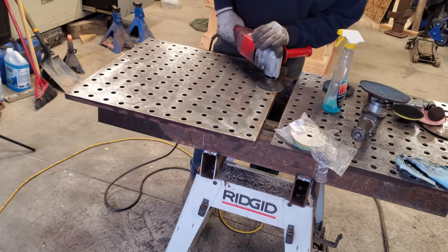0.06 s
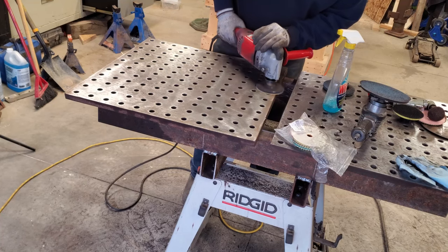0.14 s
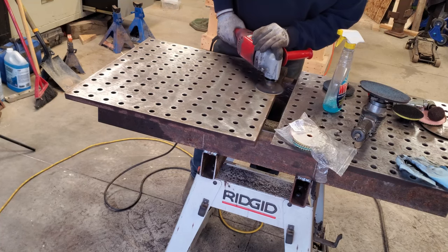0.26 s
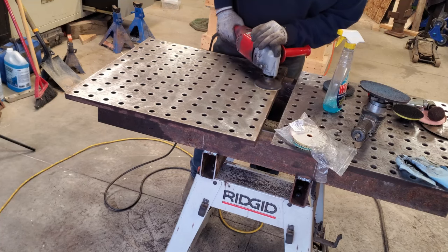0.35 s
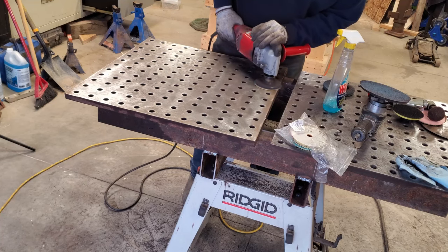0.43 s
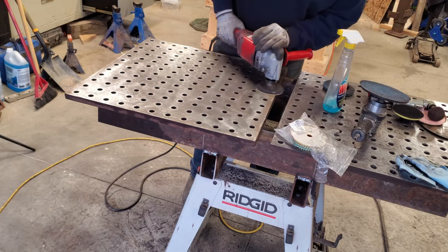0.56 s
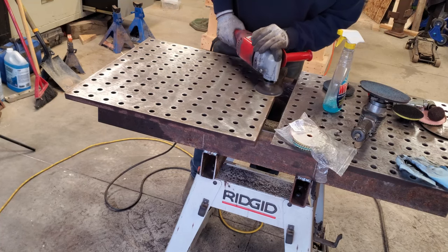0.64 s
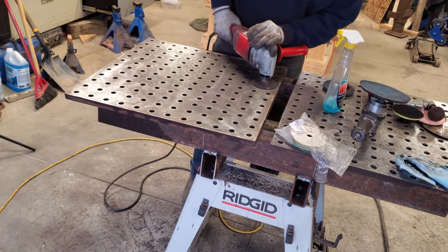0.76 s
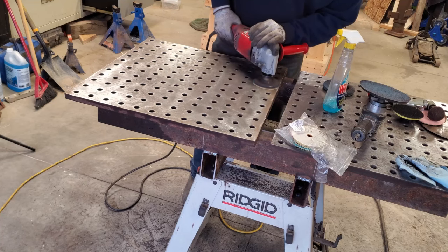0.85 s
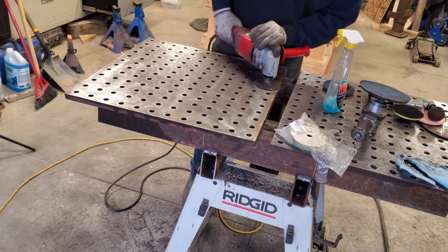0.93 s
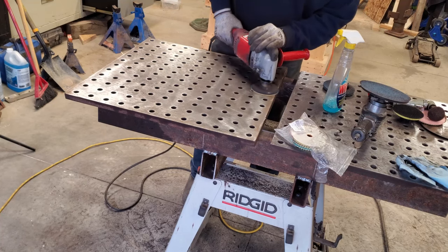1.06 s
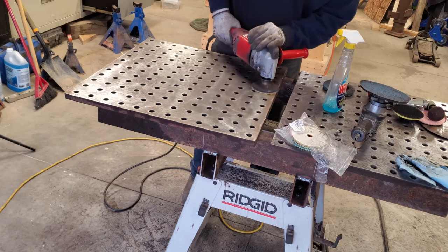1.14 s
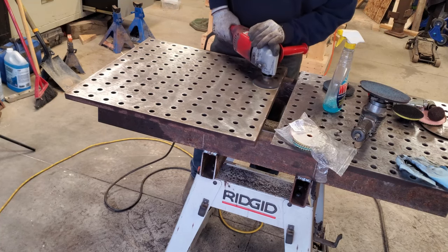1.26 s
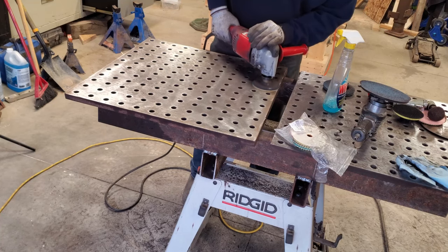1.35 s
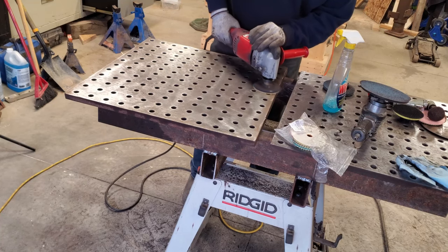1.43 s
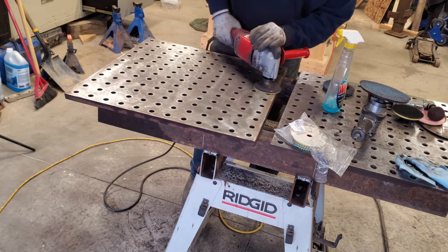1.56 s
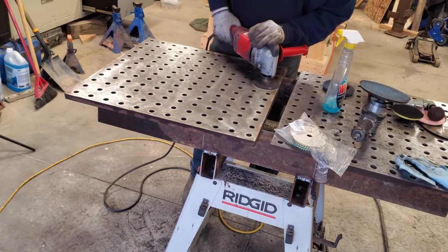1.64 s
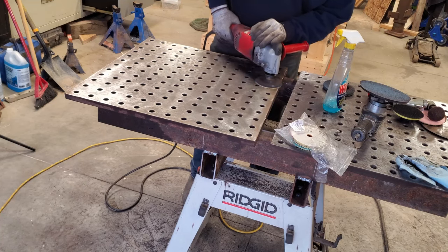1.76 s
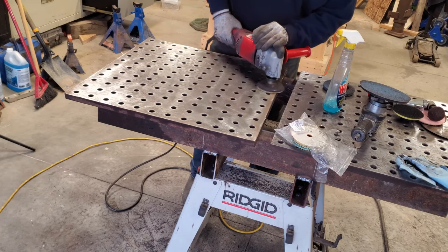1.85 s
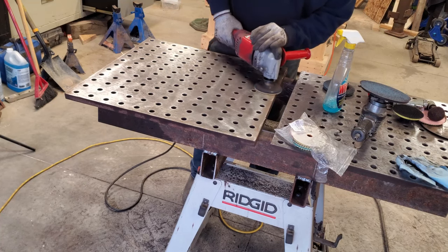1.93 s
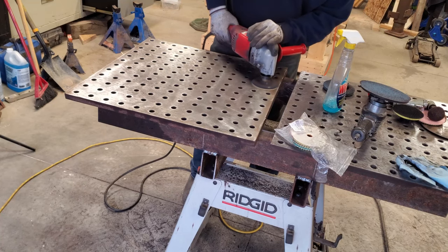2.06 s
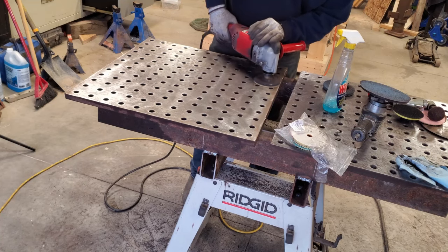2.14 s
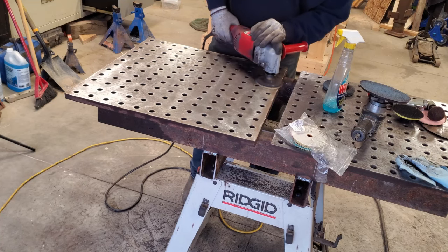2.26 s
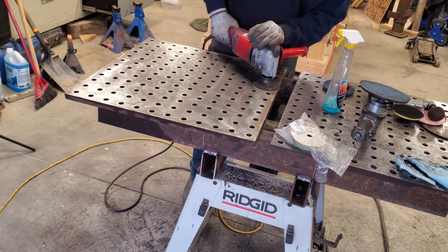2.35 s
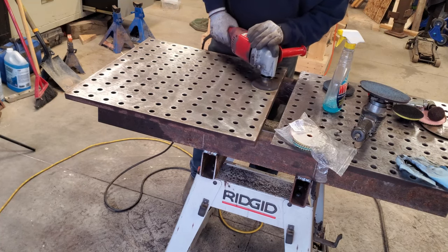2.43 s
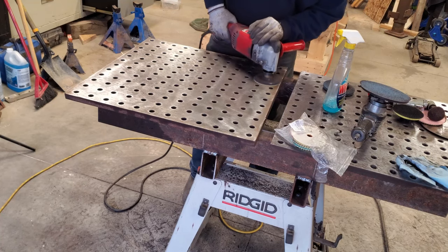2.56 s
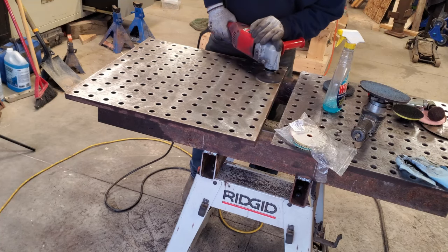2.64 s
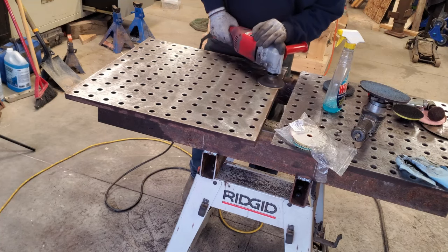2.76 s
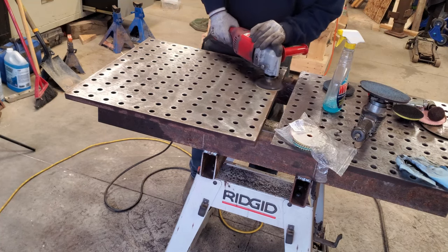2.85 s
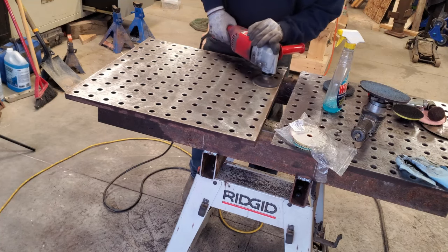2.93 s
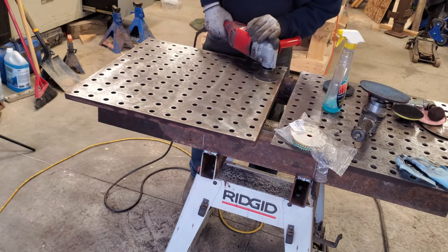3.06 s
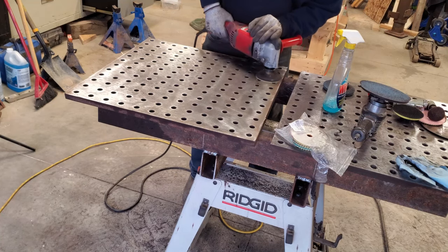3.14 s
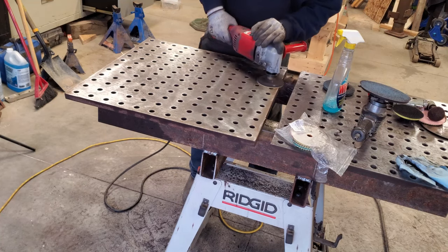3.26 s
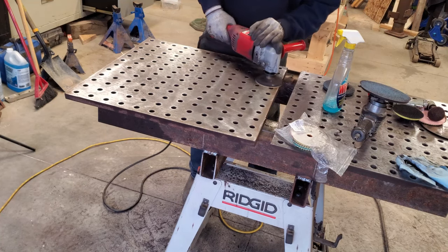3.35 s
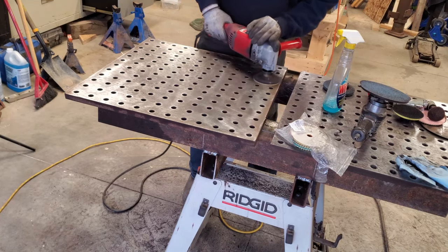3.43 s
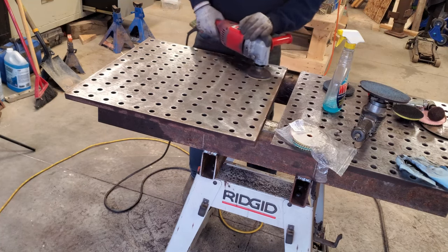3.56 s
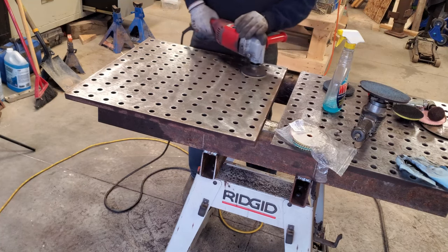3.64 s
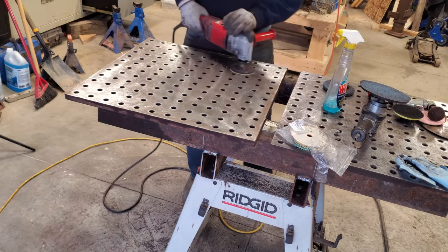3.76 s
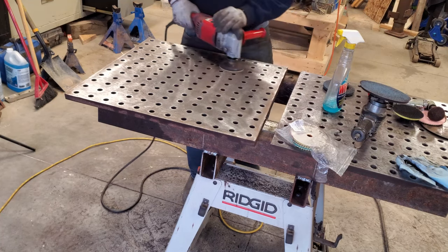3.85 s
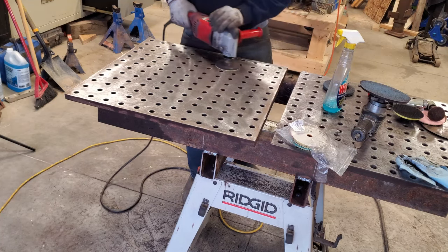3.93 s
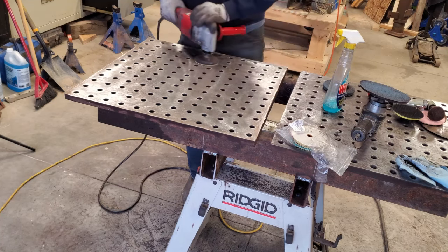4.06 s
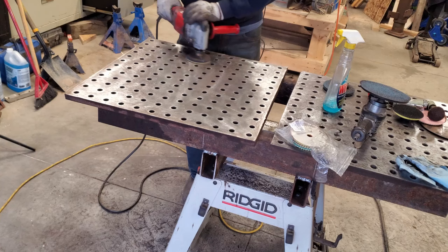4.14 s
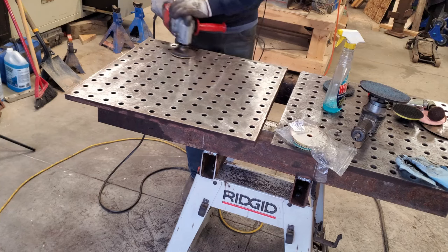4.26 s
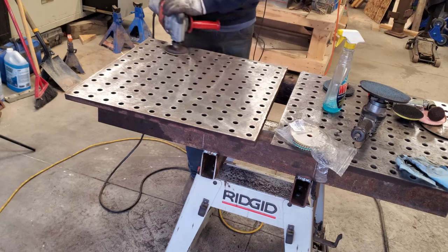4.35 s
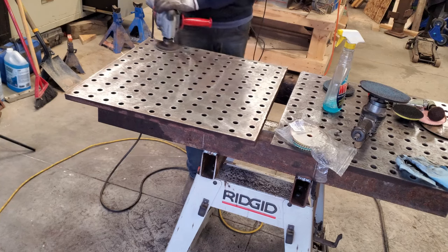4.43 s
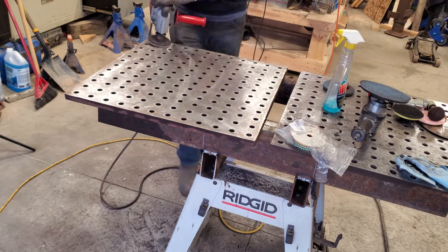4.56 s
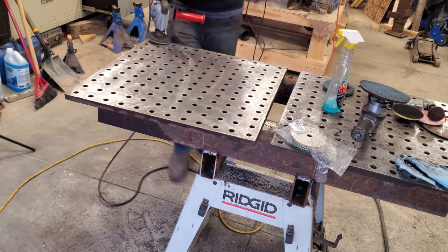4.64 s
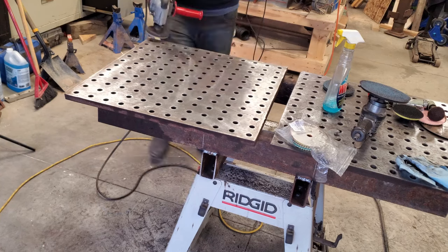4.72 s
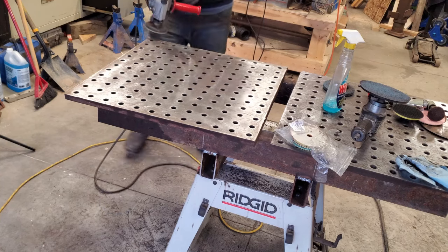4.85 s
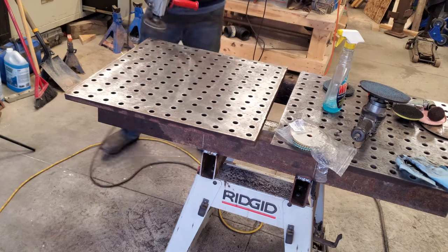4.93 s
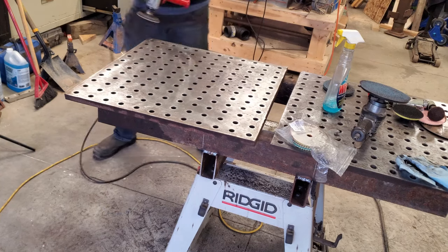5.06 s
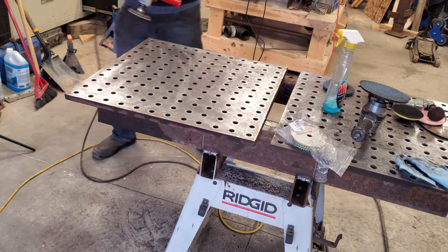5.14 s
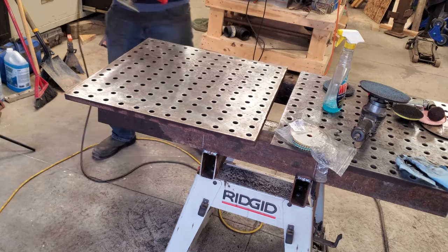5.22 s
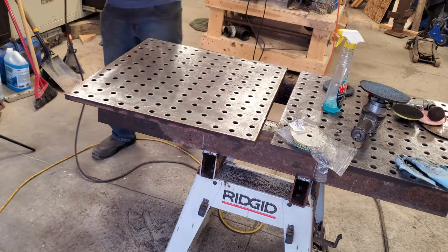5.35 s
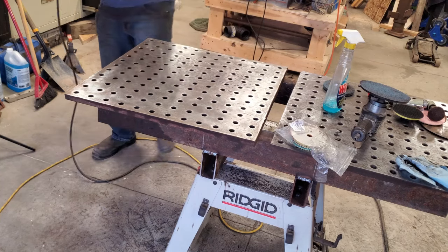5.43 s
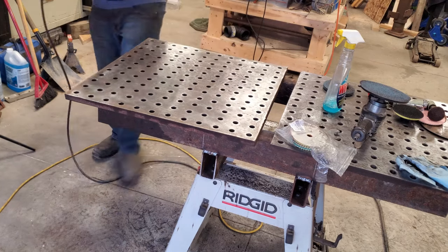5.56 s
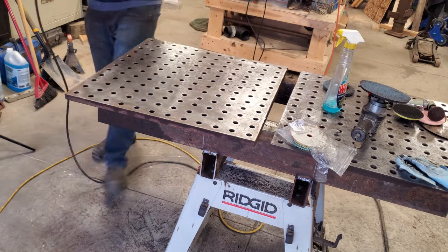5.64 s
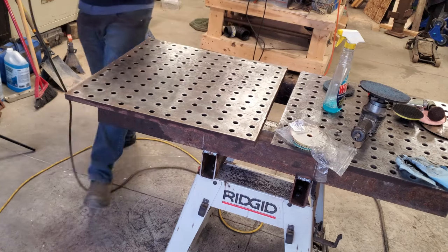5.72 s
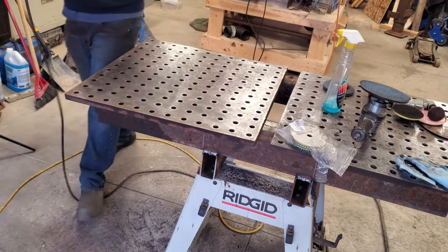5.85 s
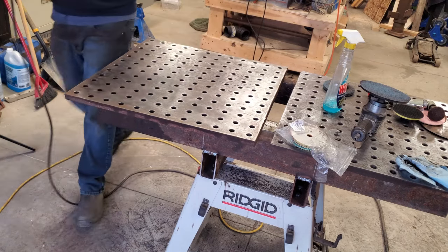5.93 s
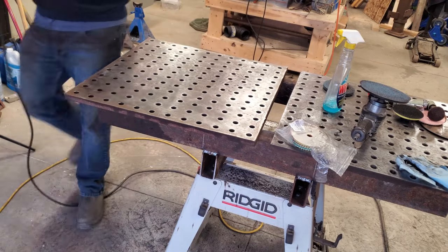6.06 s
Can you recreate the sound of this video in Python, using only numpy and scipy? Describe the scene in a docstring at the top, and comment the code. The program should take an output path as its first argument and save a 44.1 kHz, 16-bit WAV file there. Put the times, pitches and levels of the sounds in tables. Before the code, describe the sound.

An electric polisher grinds a steel plate in a workshop, its high motor whine fluttering over rushing air, a sharp hiss and a light metallic ring. The motor sags a little, then is switched off about halfway through and winds down with rattling gears. The hiss fades as the disc lifts, and faint footsteps follow. The tool is nearby, somewhat to the left.

```python
"""In a workshop, an electric polisher grinds a steel plate with a diamond disc. The motor whines and
sags under load, its fan rushes, and at about 3.5 s it is switched off and coasts down with rattling
gears. The disc hisses and makes the plate ring until it lifts off at 4.7 s; the worker steps back with
the tool. Underneath lie room rumble and a soft boom, and near the end a brief hum and a tick."""
import sys
import numpy as np
from scipy import signal
from scipy.fft import rfft, irfft, next_fast_len
from scipy.io import wavfile
from scipy.ndimage import map_coordinates

SR = 44100
rng = np.random.default_rng(int(sys.argv[2]) if len(sys.argv) > 2 else 0)


def master_out(mix):
    """Clip the mix to full scale and print it as 16-bit PCM to the path in sys.argv[1]."""
    frames = np.transpose(np.atleast_2d(mix))
    ceiling = np.clip(frames, -1, 1)
    pcm = np.round(ceiling * 32767).astype(np.int16)
    wavfile.write(sys.argv[1], SR, pcm)


N = 268555

# a motor tone flares as the tool is pressed and turned: t/s, tone, peak/dB, length/s
FLARES = [(.31, "top", -36, 0.12), (.43, "low", -35.5, 0.13), (.61, "high", -34.5, .1),
          (2.42, "high", -40, 0.3), (.71, "top", -32.5, .09), (.89, "mid", -30.5, 0.093),
          (1.34, "mid", -37, 0.25), (1.42, "top", -40, 0.18), (1.77, "mid", -36, 0.14),
          (1.79, "low", -31.5, .14), (1.8, "high", -36, 0.16), (1.98, "high", -36, .12),
          (2.06, "mid", -36.5, 0.14), (2.22, "top", -39, .2), (2.25, "rotor", -44, 0.68),
          (2.67, "low", -32.5, 0.21), (3.17, "low", -33, 0.18), (3.71, "low", -37, 0.06),
          (3.72, "top", -36, 0.09), (4.56, "high", -42, .07), (5.91, "rotor", -52.5, 0.31)]
# pressure on the disc, as relative hiss; it eases off, then lifts: t/s, level/dB
PRESSURE = [(0, -34), (.35, -33), (1.6, -34), (3.75, -34), (4.0, -33.5), (4.18, -35), (4.29, -38),
            (4.61, -40.5), (4.72, -51), (6.09, -48)]


def motor(speed, angle):
    """Tones locked to the shaft fade as it slows; uneven tooth contact makes each one flutter."""
    # loud tones: tone, level at full speed/dB, loss per halving of speed/dB
    whine = [("rotor", -51, 28), ("low", -40, 15), ("mid", -45.5, 12), ("high", -40.5, 20),
             ("top", -40.5, 10)]
    # their pitches: tone -> multiple of the shaft rate
    orders = {"rotor": 2, "low": 4, "mid": 5.375, "high": 6, "top": 6.992}
    # faint tones: multiple of the shaft rate, relative level/dB, loss per halving of speed/dB
    overtones = [(3.45, -54, 8), (4.83, -62, 18), (5, -50, 20), (8, -42, 45), (14, -55.5, 11)]
    halvings = np.log2(speed.max() / speed)
    slack = np.clip((halvings - .09) / .1, 0, 1)  # unpowered gears run loose and blur the tones
    blur_rad = .15 + .5 * slack

    def tone(order, gain):
        flutter_db = 1.5 * wobble(12) + 1.5 * wobble(80)
        return gain * unit(amp(flutter_db) * np.sin(order * angle + blur_rad * wobble(80)))
    tones = 0
    for name, db, fade_db in whine:
        steady = amp(db - fade_db * halvings + wobble(7.7))
        tones += tone(orders[name], np.hypot(steady, swells(FLARES, name)))
    for order, db, fade_db in overtones:
        tones += tone(order, amp(db - 2.5 - fade_db * halvings + 2 * wobble(3.26)))
    return workshop(tones, wet_db=-14)


def grit(angle):
    """Countless diamond scratches hiss, pressed a little harder once a disc turn."""
    # scratch spectrum: f/Hz, level/dB
    spectrum = [(2000, -38), (4000, -20.5), (6500, -2), (7600, -10), (8300, -7), (9200, -2), (10500, -3),
                (12300, 0.5), (14000, -2.5), (15700, -6)]
    hiss_db, = curves(PRESSURE)
    disc_angle = angle / 8
    flicker_db = .35 * np.cos(disc_angle) + .35 * wobble(14) + .55 * wobble(600)
    return amp(hiss_db + 6 + flicker_db) * coloured(noise(), spectrum)


def gears(angle):
    """Teeth chatter once a shaft turn, swell once a disc turn and ring the housing, louder under load."""
    # spectrum of the tooth contacts: f/Hz, level/dB
    spectrum = [(710, -61), (1200, -9), (1310, -25), (1800, -7), (2160, 0.5), (2390, -1), (2650, 1),
                (2970, -3), (3190, -0.5), (3450, 1.5), (3950, -5.5), (5380, -6), (8000, -24.5),
                (10400, -62), (17600, -120)]
    # the rattle shifts as the gears knock about: t/s, change/dB, length/s
    knocks = [(3.28, 0.2, 0.28), (3.75, -0.2, .25), (5.032, 1, 0.17)]
    rattle = amp(-31.5 + 0.3 * load() + 0.22 * wobble(5.35))
    rattle = np.hypot(rattle, 0.677 * swells(FLARES, "mid"))
    rattle *= amp(sum(db * bell(s, length) for s, db, length in knocks))
    disc_angle = angle / 8
    chatter = unit(amp(0.32 * np.cos(angle) + 0.28 * np.cos(disc_angle) + wobble(160)))
    teeth = coloured(chatter * noise(), spectrum)
    lift_dip = amp(-3 * bell(4.77, length=0.28))  # the disc leaves the plate
    return lift_dip * (rattle * teeth + housing(angle, chatter))


def housing(angle, chatter):
    """Chatter rings the gear housing; high shaft multiples sing as they slide down through its modes."""
    # housing modes: f/Hz, width/Hz
    modes = [(1950, 120), (2330, 78), (2920, 57)]
    # drive of each: mode, relative level under full load/dB, dB per dB of load
    drives = [("low", -48.5, 0.27), ("mid", -42.5, 0.41), ("high", -43.5, 0.35)]
    # a mode swells as grip and speed change: t/s, mode, relative peak/dB, length/s
    sings = [(2.9, "low", -45, 1.0), (3.3, "high", -40, .15), (3.72, "high", -41, .17),
             (3.95, "low", -49, 1), (4.25, "mid", -37, 0.3), (4.5, "high", -49, .2),
             (4.62, "mid", -40, 0.25), (5.03, "high", -38, .24), (5.0, "mid", -46, .2),
             (5.37, "low", -44, 0.22), (5.66, "low", -59, .12), (5.65, "high", -47, .2),
             (5.8, "mid", -42.5, 0.5), (5.95, "low", -49, 0.18)]
    mesh = sum(np.sin(order * angle + 1.06 * wobble(90)) for order in range(9, 13))
    shaking = chatter * (noise() + amp(-21) * mesh)
    ring = 0
    for (hz, width), (name, db, per_load) in zip(modes, drives):
        steady = amp(db + per_load * load() + 1.9 * wobble(5.35))
        ring += np.hypot(steady, swells(sings, name)) * ringing(shaking, [(hz, width, 0)])
    return amp(2.4) * ring


def plate():
    """Low rubbing and plate ring while grinding; after lift-off, the tool's own low noise and the room."""
    # modes of plate and stand: f/Hz, width/Hz, relative level/dB
    modes = [(251, 5.4, -15), (297.5, 7.6, -14), (371, 7, -9.5), (471, 8.6, -5), (549.4, 8.9, -5.5),
             (646, 18, -4.5), (769, 11, -11), (772, 11, -2), (815, 8.8, 8.5), (834, 25, -4.5),
             (946, 7.5, 1), (1003, 18, 1.5), (1115, 11, -1.5), (1383, 5.7, -3.5)]
    # spectrum of the low-mid noise: f/Hz, level/dB
    spectrum = [(100, -51), (200, -28), (245, -16.5), (420, -12.5), (680, -7), (800, -2), (900, -3),
                (1100, -6.5), (1400, -7), (1700, -12), (2300, -10), (3700, -70)]
    # fader for the whole low-mid layer: t/s, level/dB
    fader = [(0, -35.5), (1.6, -34.8), (2.5, -35.5), (3.65, -36), (3.95, -38), (4.5, -38.5), (4.9, -43.5),
             (5.1, -42.5), (6.09, -44.5)]
    # the disc catches and the plate rings up: t/s, rise/dB
    bites = [(.06, 5), (.34, 3.5), (.64, 2), (1.2, 1.5), (1.56, 4.5), (3.44, 4)]
    level_db, = curves(fader)
    bite_db = 0.5 * load() + sum(db * bell(s, length=0.15) for s, db in bites)
    low_noise = amp(-1.2) * coloured(noise(), spectrum)
    ring = amp(-2.7 + bite_db) * ringing(noise(), modes)
    return amp(level_db + 0.56 * wobble(12)) * (low_noise + ring)


def fan(speed):
    """Cooling air rushes through the vents, louder with speed."""
    # air spectrum: f/Hz, level/dB
    spectrum = [(300, -68), (1200, -7.5), (1600, -3), (1900, 0), (2600, -7.5), (3400, 1.5), (4400, 0),
                (5500, -2), (6700, -4.5), (7400, -16.5), (10000, -37)]
    level_db = -30 + 14 * np.log2(speed / speed.max()) + .5 * wobble(10)
    return amp(level_db) * coloured(noise(), spectrum)


def footsteps():
    """Boots thud softly on concrete."""
    # footfalls: t/s, level/dB
    steps = [(4.28, -54), (5.0, -57), (5.04, -54), (5.41, -58), (5.84, -56)]
    thuds = sum(amp(db) * decay(s, t60=0.42) for s, db in steps)
    return thuds * coloured(noise(), [(20, -10), (60, -5), (250, -2), (800, -23), (3000, -60)])


def tick():
    """A small sharp tick: a few milliseconds of bright noise."""
    return amp(-31) * decay(5.992, t60=0.033) * coloured(noise(), [(4000, -34), (12000, -3)])


def hum():
    """A brief low hum wavers in pitch and level."""
    hz = 270 * (1 + 0.0183 * wobble(16))
    gain = amp(-59 + 1.8 * wobble(25)) * bell(5.59, length=0.58)
    return gain * unit(np.sin(2 * np.pi * np.cumsum(hz) / SR))


def boom():
    """A soft boom near 70 Hz swells now and then."""
    # its swells: t/s, peak/dB, length/s
    booms = [(1.744, -57, .14), (2.042, -54.5, .2), (2.93, -56, .17), (3.36, -58, 0.13)]
    steady = amp(-66.5 + 2.9 * wobble(6.4))
    gain = np.hypot(steady, sum(amp(db) * bell(s, length) for s, db, length in booms))
    return gain * coloured(noise(), [(35, -47), (58, -10.5), (70, -4.5), (85, -10), (130, -33)])


def rumble():
    """Low room tone drifts gently in level."""
    # rumble spectrum: f/Hz, level/dB
    spectrum = [(20, -16), (45, -15), (70, -8.5), (100, -4.5), (125, -6.5), (170, -4), (210, -8), (260, -1),
                (500, -3), (1500, -27.5)]
    return amp(-57 + 0.73 * wobble(5.2)) * coloured(noise(), spectrum)


def workshop(x, wet_db):
    """A mono sound plus the room's stereo tail, which lasts longest in the mids."""
    # reverb time: f/Hz, t60/s
    t60s = [(200, 0.37), (2000, 1), (10000, 0.1)]
    hz, t, spectra = signal.stft(rng.standard_normal((2, SR // 2)), SR, nperseg=256)
    _, tail = signal.istft(spectra * amp(-60 * t / along(t60s, hz)[:, None]), SR, nperseg=256)
    tail /= np.linalg.norm(tail[0])
    return x + amp(wet_db) * signal.fftconvolve(x[None], tail, axes=1)[:, :N]


def load():
    """Load on the disc in dB: about 0 while grinding, far below once lifted."""
    press_db, = curves(PRESSURE)
    return press_db - np.median(press_db)


def amp(db):
    """Decibels to gain."""
    return 10 ** (np.asarray(db) / 20)


def unit(x):
    """Scale to rms 1."""
    return x / np.sqrt(np.mean(x ** 2) + 1e-20)


def along(points, hz):
    """(f/Hz, value) points read on a log axis."""
    freqs, values = np.transpose(points)
    return np.interp(np.log(hz + 1), np.log(freqs + 1), values)


def curves(rows):
    """One value per sample for each column after the time."""
    times, *columns = np.transpose(rows)
    return [np.interp(np.arange(N) / SR, times, column) for column in columns]


def wobble(rate):
    """A smooth random curve, rate knots a second."""
    coarse = np.arange(0, N + 16, 16)
    knots = rng.standard_normal(int(N * rate / SR) + 4)
    return np.interp(np.arange(N), coarse, map_coordinates(knots, [coarse * rate / SR]))


def bell(s, length):
    """A smooth swell to 1 at time s, above one half for the given length."""
    return .5 ** np.minimum((2 * (np.arange(N) / SR - s) / length) ** 2, 60)


def swells(rows, name):
    """Summed gain of the (t/s, name, peak/dB, length/s) swells that carry this name."""
    return sum(amp(db) * bell(s, length) for s, which, db, length in rows if which == name)


def decay(s, t60):
    """A jump to 1 at time s that falls 60 dB in t60 seconds."""
    age = np.arange(N) / SR - s
    return amp(-60 * np.abs(age) / t60) * (age > 0)


def filtered(x, response):
    """x through a complex frequency response."""
    size = next_fast_len(N + SR // 2)
    return irfft(rfft(x, size) * response(np.fft.rfftfreq(size, 1 / SR)), size)[..., :N]


def coloured(x, spectrum):
    """x shaped by a (f/Hz, level/dB) spectrum, at rms 1."""
    return unit(filtered(x, lambda hz: amp(along(spectrum, hz))))


def ringing(x, modes):
    """x through (f/Hz, width/Hz, level/dB) resonances, at rms 1."""
    def response(f):
        return sum(amp(db) * 1j * f * width / (hz * hz - f * f + 1j * f * width)
                   for hz, width, db in modes)
    return unit(filtered(x, response))


def noise():
    """Stereo white noise: narrow in the bass, wide in the treble."""
    # left-right likeness: f/Hz, correlation
    likeness = [(60, 0.66), (300, 0.86), (800, 0.66), (2000, 0.29), (4000, 0.23), (7000, 0.38),
                (10000, 0.26), (14000, 0.14)]

    def mid_side(hz):
        spread = np.arccos(along(likeness, hz)) / 2
        return np.array([np.cos(spread), np.sin(spread)])
    mid, side = filtered(rng.standard_normal((2, N)), mid_side)
    return np.array([mid + side, mid - side])


def panned(x, left_db):
    """Lean x to the left by a level difference."""
    return x * amp(np.array([[.5], [-.5]]) * left_db)


def delayed(x, lag):
    """The left channel arrives lag samples after the right one."""
    return np.array([map_coordinates(channel, [np.arange(N) + side * lag], order=5)
                     for channel, side in zip(x, (-.5, .5))])


def scene():
    """Tool and plate are louder on the left and move further left as the worker steps away."""
    # motor shaft, steady, sagging under load, then coasting: t/s, turn rate/Hz
    shaft = [(0, 576.8), (1.65, 576.2), (1.9, 570.8), (2.1, 562.2), (2.5, 556.5), (2.9, 549), (3.3, 545),
             (3.45, 537.5), (3.58, 524), (3.7, 494), (4.05, 436), (4.45, 374), (4.85, 324), (6.09, 206)]
    # place of the tool: t/s, left minus right/dB, left lag/samples
    place = [(0, 4.5, 2), (2, 5.5, 2), (3.6, 5.5, 2), (4.3, 6, 0), (5.1, 5.5, -1.5), (6.09, 6.5, -1.5)]
    speed, = curves(shaft)
    left_db, lag = curves(place)
    angle = 2 * np.pi * np.cumsum(speed * (1 + 0.0006 * wobble(12))) / SR
    tool = motor(speed, angle) + fan(speed) + gears(angle) + plate()
    work = panned(tool, left_db) + grit(angle)
    background = rumble() + boom() + hum() + footsteps() + tick()
    return delayed(work, lag) + panned(background, left_db=1)


def record(dry):
    """A brick-wall low-pass takes off the very top."""
    return filtered(dry, lambda hz: hz < 15750)


dry = scene()
out = record(dry)
master_out(out)
```